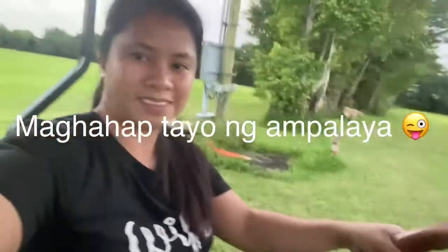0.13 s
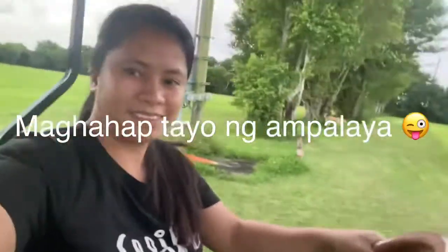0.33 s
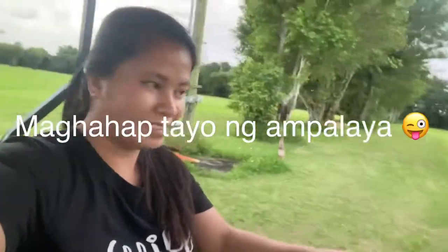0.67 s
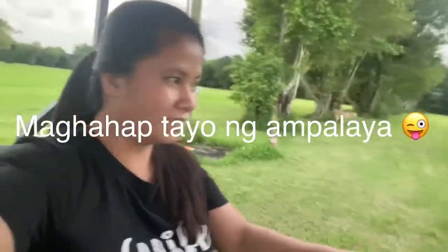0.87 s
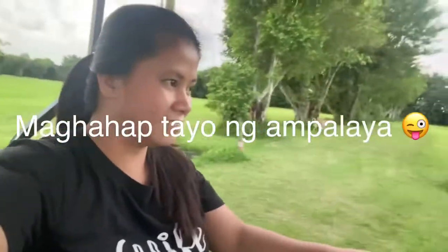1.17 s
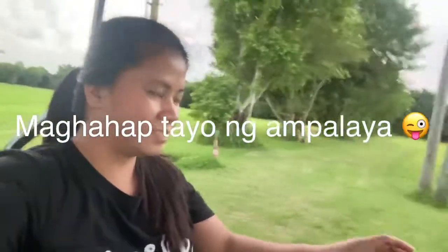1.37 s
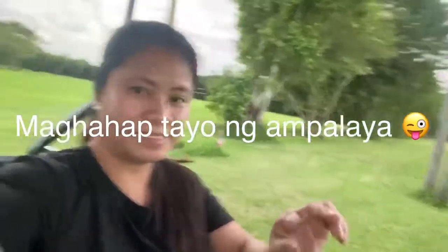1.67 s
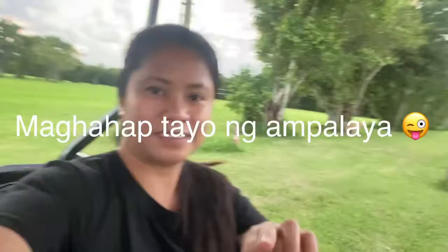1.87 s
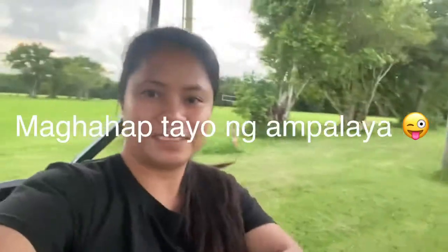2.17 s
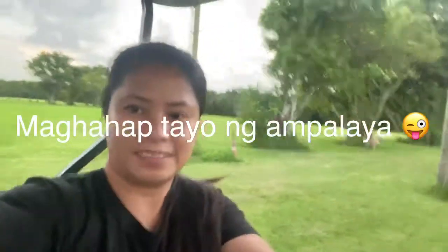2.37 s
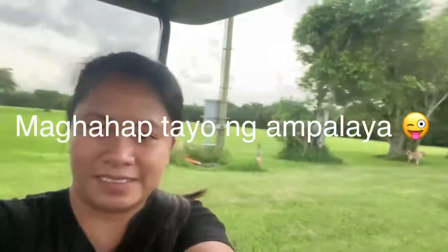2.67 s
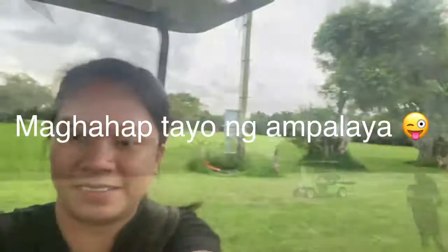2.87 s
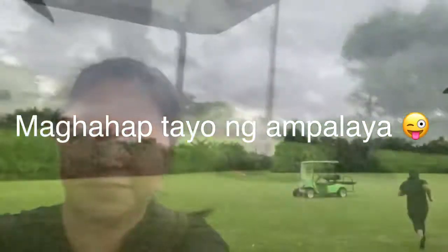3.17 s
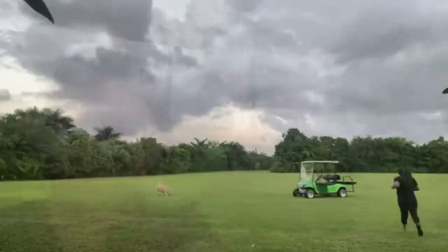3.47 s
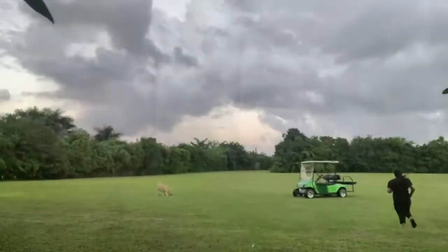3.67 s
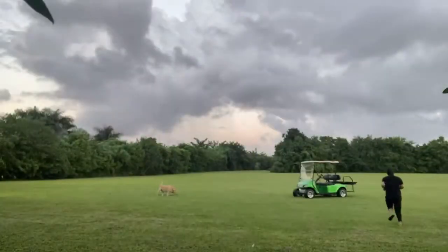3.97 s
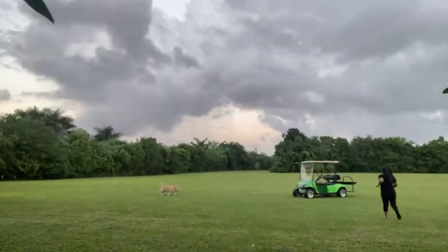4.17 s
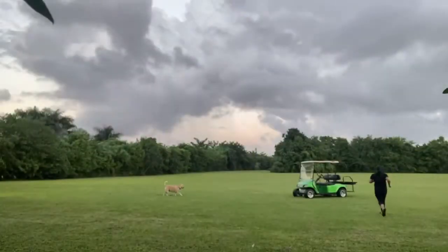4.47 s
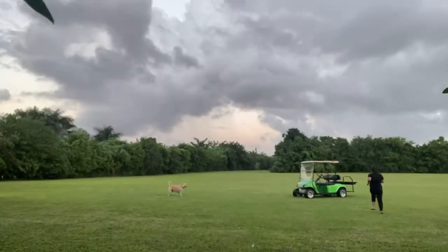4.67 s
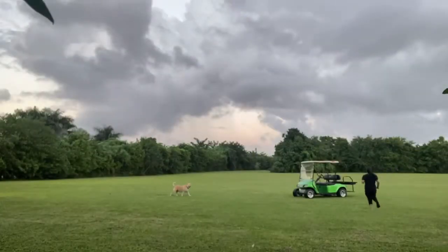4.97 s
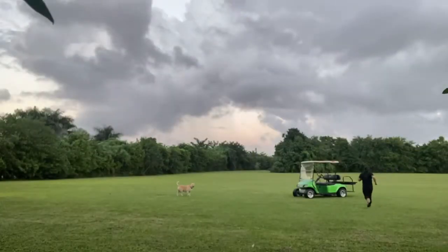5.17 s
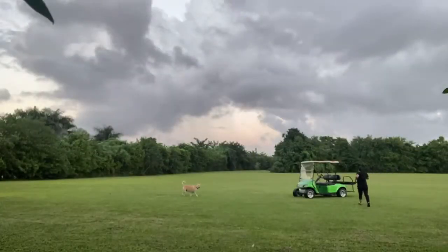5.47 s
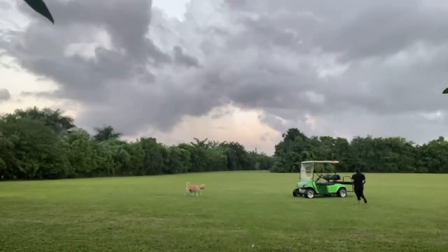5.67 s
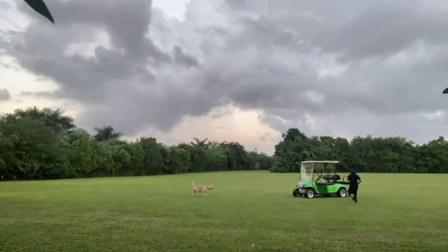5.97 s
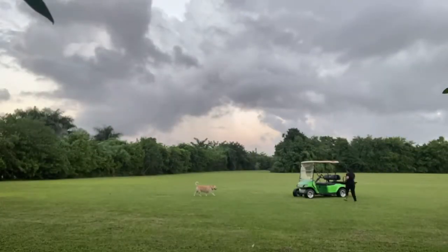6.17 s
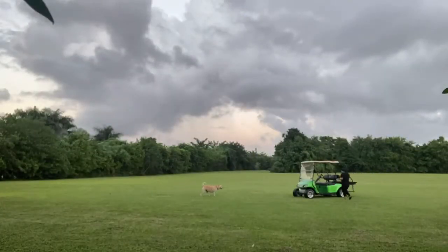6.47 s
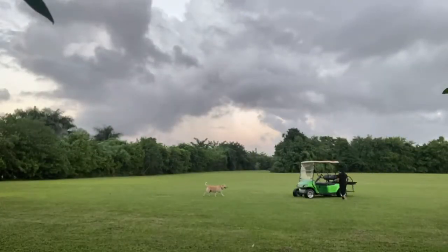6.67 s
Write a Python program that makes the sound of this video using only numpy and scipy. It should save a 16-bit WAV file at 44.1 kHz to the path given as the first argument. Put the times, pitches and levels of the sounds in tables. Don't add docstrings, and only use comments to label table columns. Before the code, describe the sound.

Close, loud and rough stereo sound from a handheld microphone aboard a cart: droning motor, dense knocks, bright metallic pings and panel slaps, slightly rising in speed. It ends abruptly, then a hushed outdoor field swells up with thin high cricket chirps, insect hiss, soft road rumble, a rising distant motor, a steadier one nearing, one tiny bird peep and faint grassy running steps.

```python
import sys
import numpy as np
from scipy import signal
from scipy.fft import rfft, irfft, next_fast_len
from scipy.io import wavfile
from scipy.ndimage import uniform_filter1d, map_coordinates

SR = 44100
rng = np.random.default_rng(int(sys.argv[2]) if len(sys.argv) > 2 else 0)


def persist_wave(psi):
    counts = np.round(np.clip(psi, -1, 1) * 32767).astype(np.int16)
    wavfile.write(sys.argv[1], SR, np.atleast_2d(counts).T)


def gain_from_decibels(decibels):
    exponent = np.asarray(decibels, float) / 20
    return 10 ** exponent


N = 300321
TIME = np.arange(N) / SR
CUT_S = 2.6478
FADE_S, FADE_POWER = 1.53, 1.11

# (frequency [Hz], density [dB/Hz])
RUMBLE = [(15, -49), (25, -37.5), (51, -1), (75, 5), (113, -2), (152, -3), (181, -14), (260, -38),
          (340, -62), (570, -120)]
# (frequency [Hz], density [dB/Hz])
ROAR = [(120, -30), (200, 2), (243, -4.5), (486, -6), (582, -4), (907, -7.5), (1450, -21.5), (2360, -38),
        (5280, -83), (5500, -49), (7150, -81), (12100, -120)]
# (time [s], level [dB])
TRAFFIC = [(2.8, -42.5), (3.2, -42), (3.5, -43.5), (3.8, -42), (4.05, -38.5), (4.3, -42.5), (4.6, -40.5),
           (4.85, -38.5), (5.15, -44), (5.4, -39.5), (5.6, -41), (5.85, -42), (6.1, -42.5), (6.3, -39.5),
           (6.5, -44.5), (6.81, -38.5)]
ROAR_DB, ROAR_DB_PER_S = -51.5, 0.53

# (time [s], firing rate [Hz])
PULLING = [(2.9, 124), (3.5, 138), (4.3, 153), (5.45, 176), (5.9, 194.5), (6.08, 197), (6.25, 204.5),
           (6.41, 204.5), (6.65, 216), (6.81, 219)]
# (frequency [Hz], level [dB])
EXHAUST = [(135, -57), (178, -45.5), (200, -58), (255, -63), (275, -61), (295, -63), (330, -53.5),
           (365, -57), (400, -53), (560, -54), (590, -44), (615, -32.5)]
THIRD_DB = -22
# (time [s], level [dB])
STEADY = [(3.5, -70), (4.5, -62), (5.1, -57), (5.35, -50.5), (5.85, -48), (6.81, -49)]
# (overtone [-], level re firing [dB])
LOADED = [(2, -8), (4, -4)]
STEADY_HZ, LIFT_S, LIFT_DB = 144.3, 5.95, -16
# (overtone [-], level [dB])
GEAR = [(2, -57), (3, -58)]
GEAR_HZ, GEAR_S, GEAR_LONG_S = 328, 6.06, .07

# (frequency [Hz], density [dB/Hz])
AIR = [(2000, -120), (3000, -11.5), (5500, -17), (6200, 21), (6700, -18.5), (7000, -19), (7500, -6.5),
       (8200, 9.5), (8800, -3), (9200, -17), (10500, -15), (13200, -13), (15800, -36)]
# (pitch [Hz], peak [dB], chirps as (first wing stroke [s], strokes [-]))
CRICKETS = [
    (6160, -50, [(3.208, 3), (3.53, 2), (3.785, 5), (4.31, 1), (4.35, 3), (4.76, 2), (4.97, 3), (5.25, 2), (5.41, 2), (5.665, 2), (5.78, 3), (6.075, 2), (6.34, 3), (6.577, 2)]),
    (6230, -51, [(2.93, 3), (3.485, 3), (4.06, 3), (4.53, 1), (4.63, 3), (4.92, 1), (5.083, 2), (5.432, 2), (5.49, 1), (5.548, 1), (6.093, 2), (6.635, 3)]),
    (6490, -57, [(2.8, 2), (3.12, 3), (3.255, 1), (3.59, 4), (3.93, 3), (4.25, 3), (4.66, 4), (5.0, 4), (5.41, 3), (5.77, 3), (6.035, 1), (6.09, 1), (6.165, 2), (6.345, 2), (6.54, 2), (6.675, 2)]),
    (6640, -66, [(3.27, 2), (3.7, 2), (4.15, 3), (4.6, 3), (4.95, 2), (5.345, 3), (5.91, 2), (6.28, 2), (6.73, 2)]),
    (6390, -61, [(3.81, 2), (4.2, 2), (4.45, 3), (5.3, 2), (5.61, 2), (5.95, 2)]),
]
STROKE_S, EVERY_S, RISE_HZ = .05, .058, 80
HEDGE_DB, HEDGE_T60_S = -14, .17
# (time [s], level [dB], length [s])
STRIDES = [(3.018, -93, 0.073), (3.36, -84, 0.059), (3.703, -77, 0.077), (4.012, -79.5, 0.12),
           (4.329, -89, 0.055), (4.697, -90.5, 0.065), (4.8, -90.5, .03), (5.422, -85, 0.086),
           (5.999, -92, .06), (6.55, -90.5, 0.12)]
# (time [s], peak [dB], pitch [Hz])
STEMS = [(3.1744, -80, 3790), (3.652, -73.5, 3160), (3.849, -77, 3310), (4.5094, -71, 3050),
         (5.455, -64.5, 2710), (5.5024, -74, 2970), (5.6804, -71, 2730), (5.9074, -78, 2630),
         (6.2424, -74.5, 2570), (6.7254, -81, 2706)]
# (time [s], pitch [Hz], level [dB])
PEEP = [(4.26, 3700, -93), (4.275, 3900, -82), (4.295, 4080, -73), (4.32, 4000, -79), (4.35, 3700, -85),
        (4.37, 3610, -100)]

# (frequency [Hz], correlation [-])
FIELD_ALIKE = [(60, 1), (180, 0.32), (520, -0.46), (1530, -0.057), (4490, 0.67), (13200, -0.77)]
# (frequency [Hz], level [dB])
FIELD_LEAN = [(60, 1.1), (180, 2.8), (520, 0.79), (1530, 1.0), (4490, 0.77), (13200, 6.7)]
# (frequency [Hz], correlation [-])
RIDE_ALIKE = [(40, .84), (90, .98), (140, .95), (190, .88), (300, .65), (420, .8), (580, .45), (1050, .32),
              (2300, .33), (3000, .15), (4000, .25), (8000, .32)]
# (frequency [Hz], level [dB])
RIDE_LEAN = [(40, 0), (100, 2.2), (190, .3), (350, 2.3), (660, -.4), (1200, 1.3), (2200, 3.6), (5000, 4.4),
             (8000, 2), (13000, 0)]
# (frequency [Hz], phase [rad])
RIDE_LEAD = [(130, .05), (300, -.5), (900, -.7), (1400, 1.2), (1800, 2.8), (2300, 3.1), (3000, 2.7),
             (4000, .7), (6300, .3), (8000, 2.4), (10000, 3.1)]

# (time [s], ping peak [dB], body over ping [dB], body t60 [s])
RATTLES = [(0.0112, -24, 1, 0.05), (0.0961, -17, -3, 0.043), (0.1513, -19.5, -1, 0.05),
           (0.2179, -24, 1, 0.05), (0.2533, -26.5, 2, 0.05), (0.333, -14.5, -5.5, 0.05),
           (0.3803, -22, -0.5, 0.05), (0.4204, -36.5, -4.5, 0.05), (0.4524, -25.5, -4, 0.05),
           (0.5134, -34, -5, 0.05), (0.5771, -31, 3, 0.05), (0.6225, -30.5, -8, 0.05),
           (0.6686, -26, -9.5, 0.05), (0.8346, -13, -4.5, 0.034), (0.9364, -28.5, -3, 0.05),
           (0.9994, -30, 1.5, 0.046), (1.0564, -30.5, 0, 0.05), (1.0999, -23.5, 0, 0.038),
           (1.2057, -30.5, 1, 0.05), (1.2784, -26, -2, 0.05), (1.3104, -33.5, -3.5, 0.05),
           (1.3434, -25.5, -3.5, 0.05), (1.3694, -31.5, -4.5, 0.05), (1.4047, -10.5, -14, 0.067),
           (1.4173, -20.5, -0.5, 0.05), (1.4948, -14.5, -4.5, 0.046), (1.5637, -27, -2, 0.045),
           (1.5883, -33, -6, 0.05), (1.607, -16, -7.5, 0.05), (1.6464, -32, -4.5, 0.05),
           (1.719, -20.5, -0.5, 0.05), (1.7659, -22, -3.5, 0.05), (1.8277, -26.5, -13, 0.05),
           (1.8426, -9, -8, 0.043), (1.8488, -17, 2, 0.027), (1.9819, -21.5, -1.5, 0.054),
           (2.0324, -20.5, -4.5, 0.05), (2.0601, -26, -2, 0.05), (2.1089, -31.5, -1, 0.097),
           (2.2099, -22.5, -2, 0.05), (2.2518, -25, -1, 0.05), (2.3001, -29, -4.5, 0.045),
           (2.3604, -30.5, 1.5, 0.05), (2.4952, -25.5, 0.5, 0.05), (2.6224, -35, 1.5, 0.05)]
# (frequency [Hz], width [Hz], level [dB])
BRACKET = [(3600, 450, 0), (4500, 500, -9), (6450, 700, -5), (8200, 1500, -13), (12000, 4000, -17)]
# (frequency [Hz], width [Hz], level [dB])
PANEL = [(1137, 200, -10), (1550, 160, 1.5), (2080, 170, 4), (2550, 110, 0.5), (2980, 150, -5),
         (3650, 400, -10.5)]
SLAP_LAG_S = .0028
PING_DB, PING_T60_S, PING_TAIL_DB, BODY_DB, PING_HEAD = -0.5, 0.031, -3.5, 7.5, 1.5

# (time [s], middle peak [dB], low re middle [dB], high re middle [dB])
KNOCKS = [(0.013, -19, 3, -3.5), (0.059, -31, -12.5, -15), (0.101, -16.5, 2.5, 3),
          (0.159, -21, -1.5, -11.5), (0.217, -20.5, 1, -1), (0.255, -21, 5, -8), (0.334, -13, -7.5, -0.5),
          (0.387, -18.5, 2.5, 1), (0.454, -21, -3, -2.5), (0.493, -22, -3.5, -10.5),
          (0.523, -25, -11.5, -13.5), (0.549, -21, -7.5, -7), (0.579, -18.5, -10, 4),
          (0.632, -18.5, -2.5, -18.5), (0.677, -24, -3, -2), (0.709, -18.5, -5, -10),
          (0.762, -16.5, -5.5, -9), (0.796, -20.5, -12, -9), (0.836, -18, 3, -3.5),
          (0.883, -23.5, -7.5, -5.5), (0.971, -19.5, -8.5, -12), (1.083, -18.5, -12, -6),
          (1.157, -23.5, -8, -2), (1.21, -22, -3, -9), (1.288, -21, -0.5, -3), (1.382, -22.5, -3.5, -7.5),
          (1.418, -18.5, -1, -0.5), (1.495, -16.5, -4.5, -1.5), (1.53, -21.5, -5.5, -5.5),
          (1.614, -13, -7.5, -9.5), (1.657, -19.5, -4.5, -9), (1.726, -11, -7.5, -16.5),
          (1.766, -18.5, 3, -6.5), (1.818, -21, -6, -10), (1.843, -12.5, -5, -3.5), (1.923, -20, -4, -8),
          (1.985, -20, 5, -6.5), (2.038, -16.5, 3, -7), (2.131, -23, -3, -1), (2.199, -19.5, -6.5, -5.5),
          (2.252, -25.5, 2, -3), (2.311, -20.5, -6, -11.5), (2.361, -16, -8, -9.5),
          (2.412, -23.5, -2.5, -2), (2.441, -22, 0, -3), (2.463, -20.5, -3, -7.5), (2.502, -16.5, -6.5, -9),
          (2.533, -16, -5.5, -19), (2.598, -23.5, -1, -12.5)]
# (frequency [Hz], width [Hz], level [dB])
KNOCK_LOW = [(423, 45, 0), (463.4, 51, -7.5)]
# (frequency [Hz], width [Hz], level [dB])
KNOCK_MIDDLE = [(584, 23, 2.5), (620, 40, -5.5), (744, 80, -7.5)]
# (frequency [Hz], width [Hz], level [dB])
KNOCK_HIGH = [(853, 60, 0), (1050, 90, 8), (1400, 150, -13)]
KNOCK_DB, KNOCK_T60_S, KNOCK_HEAD = -1.5, 0.09, 3.0

# (frequency [Hz], density [dB/Hz])
ROLL = [(15, -40), (25, -23), (105, -9), (195, -15.5), (248, -25), (300, -19), (352, -27.5), (401, -24.5),
        (501, -25.5), (575, -17.5), (682, -26.5), (1500, -44.5), (1950, -59.5), (3300, -120)]
# (frequency [Hz], density [dB/Hz])
RUSH = [(400, -42), (700, -4.5), (880, -4.5), (940, -13), (1040, -2.5), (1400, -7), (2100, -9), (3100, -13),
        (4870, -21.5), (6400, -21), (8300, -24), (9500, -31.5), (10700, -25), (12700, -28), (15800, -35)]
SWAY_DB, LUMPY_DB = .8, .8
RUSH_DB, RUSH_POWER = -28.5, 1.1
# (frequency [Hz], width [Hz], level [dB])
CHASSIS = [(309.9, 17, -9.5), (385.8, 17, -0.5), (414.6, 20, 1), (464.4, 22, -5), (568, 19, 7.5),
           (613, 34, -3.5), (763, 72, -3), (913, 35, -4.5), (954, 25, 0), (1037, 14, 4), (1100, 17, -4.5),
           (1217, 8.5, -2.5), (1444, 35, -1), (1665, 34, -12.5)]
# (time [s], level [dB])
SHAKE = [(0, 0.5), (.55, -1), (.85, 0), (1.05, -7), (1.2, 0.5), (1.84, 7.5), (2.3, 4.5), (2.64, 3.5)]
LOWER_DB, UPPER_DB, UPPER_FOLLOWS = -30.5, -32.5, 0.5
# (time [s], turns [Hz])
SHAFT = [(0.0, 34.49), (0.22, 32.79), (0.44, 32.16), (0.72, 32.59), (1.46, 36.82), (2.06, 37.9),
         (2.18, 37.98), (2.64, 38.5)]
# (time [s], level [dB])
LOAD = [(0, -3), (.15, -3), (.3, 0), (.55, 0), (.8, 0.5), (1.0, 1.5), (1.2, 1), (1.4, 0.5), (1.65, 0.5),
        (1.9, 0), (2.15, -0.5), (2.4, -0.5), (2.64, -0.5)]
# (frequency [Hz], level [dB])
MOUNTS = [(66, -28), (71, -44), (76, -21), (97, -17.5), (111, -14.5), (130, -21.5), (143, -21.5),
          (151, -30.5), (160, -38.5), (179, -28.5), (195, -23), (203, -32.5), (222, -41)]
# (order [-], level [dB])
WEAK_ORDERS = [(1, -47), (2.5, -45.5), (3.5, -46), (4.5, -56.5)]
SIXTH_DB = -7.5

SMEAR_DB, SMEAR_T60_S, SMEAR_HZ = -24, 0.048, 914
GAPS = [(10, 0, 0, .6, .7), (12, .06, 0, 0, 0), (13, .97, 0, .96, .8), (14, .68, .03, .94, .8),
        (15, 0, .06, .06, .8), (16, 0, 1, 0, .98), (17, 0, 1, 0, .98), (18, 0, .99, .03, .98),
        (19, .2, .45, .88, .9), (20, 1, .05, 1, .9), (21, 1, .1, 1, .93), (22, 1, .5, 1, 1)]


def unit(x):
    return x / np.sqrt(np.mean(x ** 2) + 1e-20)


def along(points, hz):
    f, v = np.transpose(points)
    return np.interp(np.log(hz + 1), np.log(f + 1), v)


def curves(rows):
    s, *cols = np.transpose(rows)
    return [np.interp(TIME, s, c) for c in cols]


def wobble(rate_hz):
    return map_coordinates(rng.standard_normal(N // 50), [TIME * rate_hz])


def noise():
    return rng.standard_normal((2, N))


def filtered(x, response):
    m = next_fast_len(N + SR // 2)
    return irfft(rfft(x, m) * response(np.fft.rfftfreq(m, 1 / SR)), m)[..., :N]


def coloured(x, spectrum):
    return unit(filtered(x, lambda f: gain_from_decibels(along(spectrum, f))))


def resonant(modes):
    def response(f):
        total = 0
        for k, (hz, width, db) in enumerate(modes):
            damping = 1j * f * width
            total = total + (-1) ** k * gain_from_decibels(db) * damping / (hz * hz - f * f + damping)
        return total
    return response


def patchy(patchy_db):
    z = signal.stft(noise(), nperseg=512)[2]
    field = uniform_filter1d(rng.standard_normal(z.shape[1:]), size=5, axis=0)
    field = uniform_filter1d(field, size=10, axis=1)
    return signal.istft(z * gain_from_decibels(patchy_db * unit(field)), nperseg=512)[1][:, :N]


def hum(turns, orders, flutter_db, rate_hz):
    total = 0
    for k, db in orders:
        strength = 2 ** .5 * gain_from_decibels(db + flutter_db * wobble(rate_hz))
        total = total + strength * np.cos(2 * np.pi * k * turns + k * k + .4 * wobble(1.5))
    return total


def add_at(out, at_s, sound):
    out[:, round(at_s * SR):][:, :sound.shape[1]] += sound


def struck(modes, t):
    return modes[0][0], filtered(TIME == 0, resonant(modes))[None, :len(t)]


def burst(t, decay, body, head):
    hz, answer = body
    uneven = gain_from_decibels(9 * uniform_filter1d(rng.standard_normal(len(t)), size=60))
    contacts = rng.standard_normal((2, len(t))) * uneven * decay
    touch = head * np.sin(np.pi * np.clip(t * hz * 2, 0, 1))
    rung = signal.fftconvolve(contacts + touch, answer, axes=1)[:, :len(t)]
    return rung / np.abs(rung).max(axis=1, keepdims=True)


def ports(pair, alike, lean, lead):
    def turn(f):
        return np.arccos(np.clip(along(alike, f), -1, 1)) / 2

    def tilt(f):
        gain = gain_from_decibels(np.outer([.5, -.5], along(lean, f)))
        return gain * np.exp(np.outer([.5j, -.5j], along(lead, f)))

    mid, side = filtered(pair, lambda f: np.array([np.cos(turn(f)), np.sin(turn(f))]))
    return filtered(np.array([mid + side, mid - side]), tilt)


def far_road():
    flow_db, = curves(TRAFFIC)
    rumble = gain_from_decibels(flow_db + 0.91 * wobble(5.1)) * coloured(patchy(1.0), RUMBLE)
    roar = gain_from_decibels(ROAR_DB + ROAR_DB_PER_S * (TIME - CUT_S)) * coloured(patchy(.8), ROAR)
    return rumble + roar


def pulling_engine():
    hz, = curves(PULLING)
    overtones = [(k, along(EXHAUST, k * hz) + THIRD_DB * (k == 3)) for k in (1, 2, 3)]
    return hum(np.cumsum(hz + .8 * wobble(6)) / SR, overtones, flutter_db=2.6, rate_hz=6)


def steady_engine():
    db, = curves(STEADY)
    lifted_db = LIFT_DB * np.clip((TIME - LIFT_S) / .1 + .5, 0, 1) - 1
    overtones = [(1, db)] + [(k, db + over_db + lifted_db) for k, over_db in LOADED]
    firing = hum(STEADY_HZ * TIME, overtones, flutter_db=1.2, rate_hz=12)
    gear_turns = np.cumsum(GEAR_HZ + 2.5 * wobble(30)) / SR
    swell = np.exp(-((TIME - GEAR_S) / GEAR_LONG_S) ** 2)
    return firing + swell * hum(gear_turns, GEAR, flutter_db=2, rate_hz=25)


def insect_choir():
    blur = unit(filtered(noise(), lambda f: 1 / (1 + ((f - 6480) / 170) ** 4)))
    trill = unit(filtered(noise(), lambda f: 1 / (1 + ((f - 6190) / 80) ** 4)))
    far = gain_from_decibels(-74 + 3 * wobble(5) + 1.44 * wobble(33)) * blur
    far += gain_from_decibels(-75 + 3 * wobble(3)) * trill
    return far + gain_from_decibels(-67) * coloured(patchy(1.0), AIR)


def crickets():
    near, t = np.zeros((2, N + SR)), np.arange(round(STROKE_S * SR)) / SR
    swell = np.sin(np.pi * t / STROKE_S) ** 2
    for hz, db, chirps in CRICKETS:
        for s in [first + k * EVERY_S for first, strokes in chirps for k in range(strokes)]:
            turns = (hz + rng.normal(0, 13.0)) * t + RISE_HZ * (t / STROKE_S - 1) * t / 2
            tone = np.sin(2 * np.pi * turns + rng.uniform(0, 2 * np.pi, (2, 1)))
            add_at(near, s - STROKE_S / 2, gain_from_decibels(db + rng.normal(0, 1.2)) * swell * tone)
    tail = rng.standard_normal((2, SR // 4)) * gain_from_decibels(-60 * TIME[:SR // 4] / HEDGE_T60_S)
    tail = tail / np.linalg.norm(tail[0])
    near = near + gain_from_decibels(HEDGE_DB) * signal.fftconvolve(near, tail, axes=1)[:, :N + SR]
    rough_db = -2.5 + 1.6 * np.array([wobble(90), wobble(90)]) + .6 * wobble(700)
    return gain_from_decibels(rough_db) * near[:, :N]


def bird():
    hz, db = curves(PEEP)
    tone = np.sin(2 * np.pi * np.cumsum(hz) / SR) * (TIME > 4.25) * (TIME < 4.38)
    peep = gain_from_decibels(db + 2.96 * np.sin(2 * np.pi * 85 * TIME)) * tone
    tail = rng.standard_normal((2, SR // 4)) * gain_from_decibels(-39 - 60 * TIME[:SR // 4] / .45)
    return peep + signal.fftconvolve(peep[None], tail, axes=1)[:, :N]


def running_feet():
    swish = sum(gain_from_decibels(db) * np.exp(-((TIME - s - long / 2) / (long / 2)) ** 4) for s, db, long in STRIDES)
    grass = [(1500, -40), (3000, 1), (4500, 0), (8000, -8), (10300, -9), (12500, 0), (15800, -11)]  # (Hz, dB)
    out, t = swish * coloured(patchy(4.0), grass), np.arange(SR // 40) / SR
    for s, db, hz in STEMS:
        drift = np.cumsum(rng.normal(0, .3, (2, len(t))), axis=1)
        envelope = gain_from_decibels(db + 2 - 60 * t / .04) * (1 - np.exp(-t / .0015))
        add_at(out, s, envelope * np.sin(2 * np.pi * hz * t + drift))
    return out


def rattles():
    out, t = np.zeros((2, N + SR)), np.arange(SR // 12) / SR
    bracket, panel = struck(BRACKET, t), struck(PANEL, t)
    for s, db, body_db, t60_s in RATTLES:
        ping_decay = gain_from_decibels(-60 * t / PING_T60_S) + gain_from_decibels(PING_TAIL_DB - 60 * t / t60_s)
        slap_decay = (1 - np.exp(-t / .0005)) * gain_from_decibels(-60 * t / t60_s)
        add_at(out, s, gain_from_decibels(db + PING_DB) * burst(t, ping_decay, bracket, PING_HEAD))
        add_at(out, s + SLAP_LAG_S, gain_from_decibels(db + body_db + BODY_DB) * burst(t, slap_decay, panel, 0))
    return out[:, :N]


def knocks():
    out, t = np.zeros((2, N + SR)), np.arange(SR // 8) / SR
    decay = gain_from_decibels(-60 * t / KNOCK_T60_S)
    bodies = [struck(modes, t) for modes in (KNOCK_LOW, KNOCK_MIDDLE, KNOCK_HIGH)]
    for s, db, low_db, high_db in KNOCKS:
        low, middle, high = [burst(t, decay, body, KNOCK_HEAD) for body in bodies]
        add_at(out, s, gain_from_decibels(db + KNOCK_DB) * (gain_from_decibels(low_db) * low + middle + gain_from_decibels(high_db) * high))
    return out[:, :N]


def wheels_and_fan(hz, throb):
    roll = gain_from_decibels(-20.0 + SWAY_DB * wobble(5.3)) * coloured(throb * patchy(LUMPY_DB), ROLL)
    rush_db = RUSH_DB + 0.38 * wobble(23) + 0.24 * wobble(2.6)
    rush = gain_from_decibels(rush_db) * coloured(throb ** 0.34 * patchy(2.0), RUSH)
    return roll + (hz / 35) ** RUSH_POWER * rush


def chassis_drone(turns, throb):
    at = np.flatnonzero(np.diff(np.floor(turns)))
    chance = rng.standard_normal((len(at), 2))
    late = np.clip(at + (chance[:, 0] * 5).astype(int), 0, N - 1)
    blows = np.zeros((2, N))
    blows[0, late] = gain_from_decibels(chance[:, 1] + 1.2 * (-1.) ** np.arange(len(at)))
    shaken = filtered(0.57 * unit(blows) + 1.3 * throb * patchy(1.24), resonant(CHASSIS))
    lower = filtered(shaken, lambda f: 1 / (1 + (f / 500) ** 12))
    shake_db, = curves(SHAKE)
    drone = gain_from_decibels(LOWER_DB + shake_db) * unit(lower)
    return drone + gain_from_decibels(UPPER_DB + UPPER_FOLLOWS * shake_db) * unit(shaken - lower)


def shaft_orders(turns, hz):
    load_db, = curves(LOAD)
    strong = [(k, along(MOUNTS, k * hz) + SIXTH_DB * (k > 5.5)) for k in range(2, 7)]
    orders = gain_from_decibels(load_db) * hum(turns, strong, flutter_db=1.0, rate_hz=13)
    return orders + hum(turns, WEAK_ORDERS, flutter_db=3.0, rate_hz=3.4)


def cart():
    hz, = curves(SHAFT)
    turns = np.cumsum(hz) / SR
    throb = gain_from_decibels(2.0 * np.cos(2 * np.pi * turns) + 2.0 * np.cos(np.pi * turns))
    orders = [[1], [0]] * shaft_orders(turns, hz)
    return orders + chassis_drone(turns, throb) + wheels_and_fan(hz, throb)


def scene():
    fade = np.clip((TIME - CUT_S) / FADE_S, 0, 1) ** FADE_POWER
    engines = [[1.1], [0]] * np.sqrt(fade) * (pulling_engine() + steady_engine())
    field = fade * (far_road() + insect_choir() + crickets()) + engines + bird() + running_feet()
    field = ports(field, FIELD_ALIKE, FIELD_LEAN, [(60, 0)])
    ride = ports(rattles() + knocks() + cart(), RIDE_ALIKE, RIDE_LEAN, RIDE_LEAD)
    edge = np.clip((CUT_S - TIME) * SR / 6, 0, 1)
    dull = filtered(ride, lambda f: 1 / (1 + (f / SMEAR_HZ) ** 6))
    smear = gain_from_decibels(SMEAR_DB - 60 * np.abs(TIME - CUT_S) / SMEAR_T60_S) * (TIME > CUT_S) * dull
    return ride * edge + smear + field * np.clip((TIME - CUT_S) / 0.079, 0, 1)


def treble_gaps(pair):
    _, t, z = signal.stft(np.pad(pair, ((0, 0), (17, 0))), SR, nperseg=2048)
    luck = rng.uniform(size=(len(GAPS), 2, len(t)))[..., np.arange(len(t)) // 2]
    keep = np.ones(z.shape)
    keep[:, 23 * 32:] = 0
    for (band, *share), draw in zip(GAPS, luck):
        silent = np.where(t < CUT_S, np.c_[share[:2]], np.c_[share[2:]])
        keep[:, band * 32:band * 32 + 32] = (draw > silent)[:, None]
    return signal.istft(z * keep, SR, nperseg=2048)[1][:, 17:N + 17]


def band_limit(x):
    return signal.sosfilt(signal.butter(12, 15850, fs=SR, output="sos"), x)


def record(dry):
    left, right = dry / (1 + np.abs(dry) ** 8) ** (1 / 8)
    mid, side = treble_gaps(np.array([left + right, left - right]) / 2)
    return band_limit(np.array([mid + side, mid - side]))


dry = scene()
out = record(dry)
persist_wave(out)
```